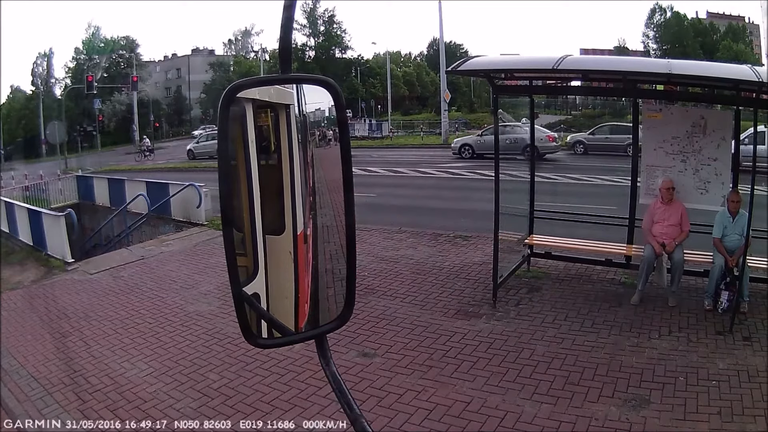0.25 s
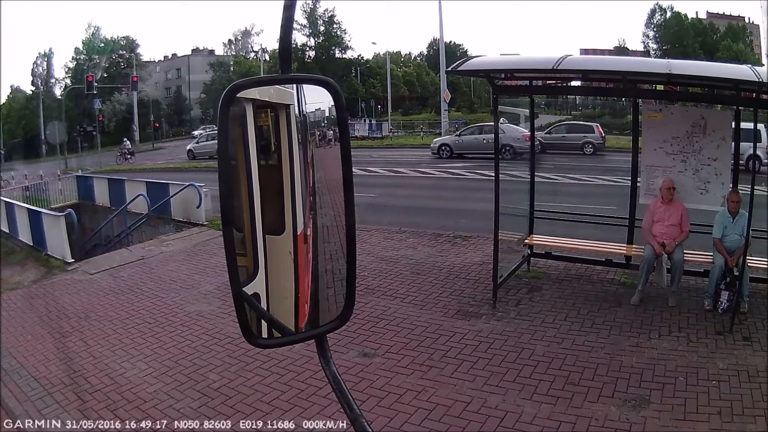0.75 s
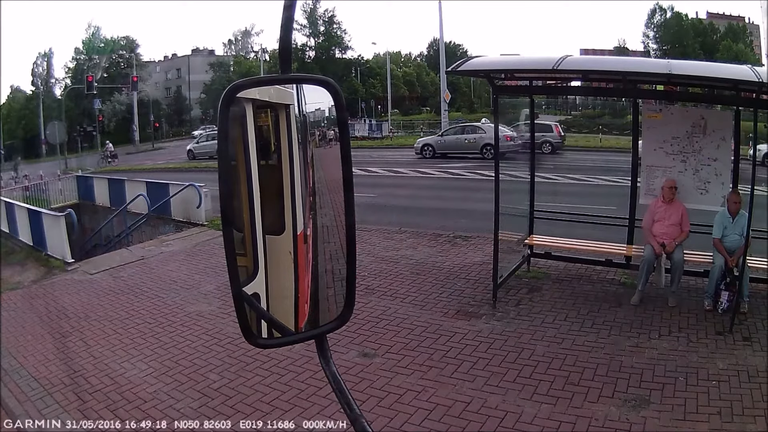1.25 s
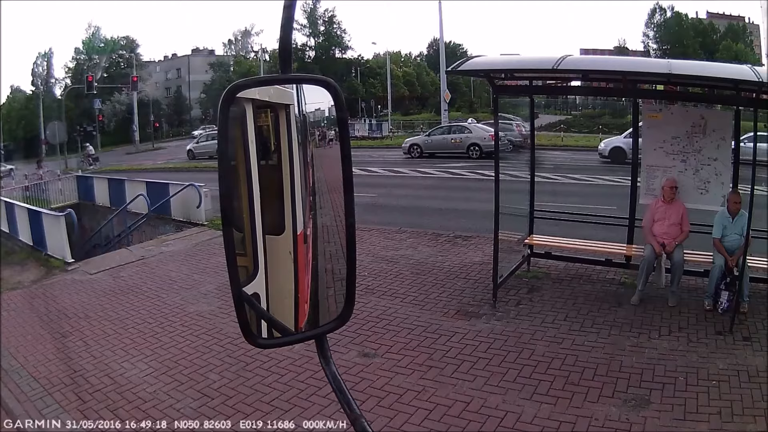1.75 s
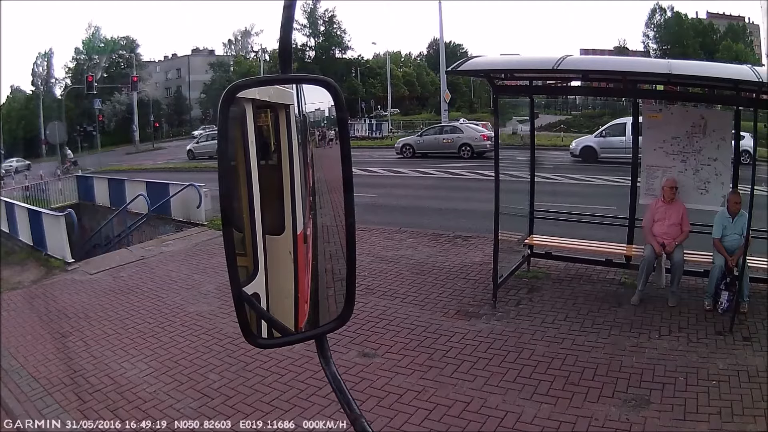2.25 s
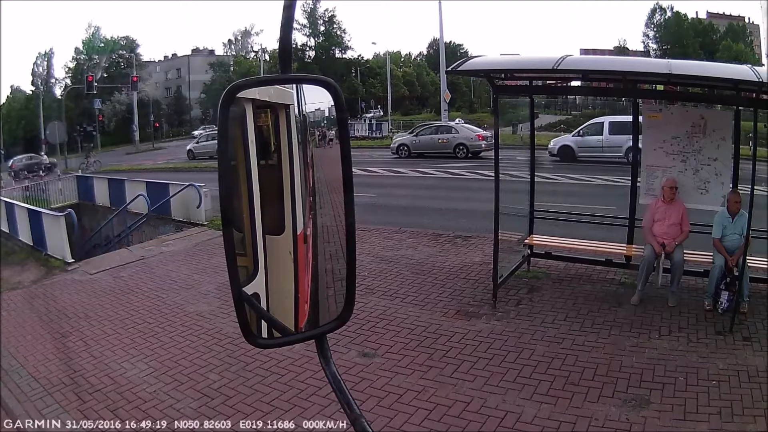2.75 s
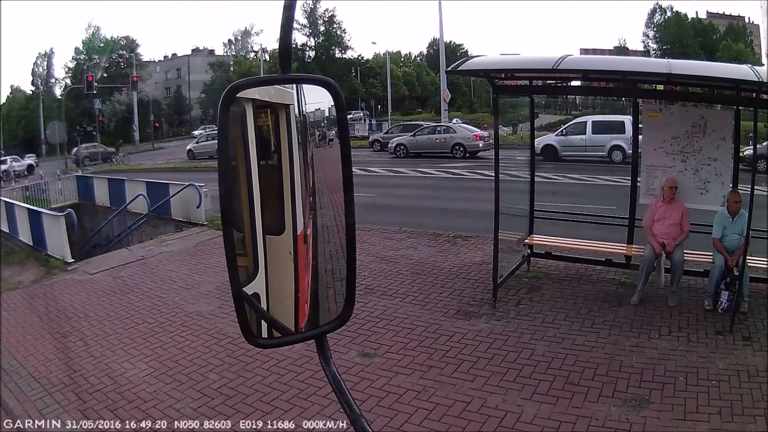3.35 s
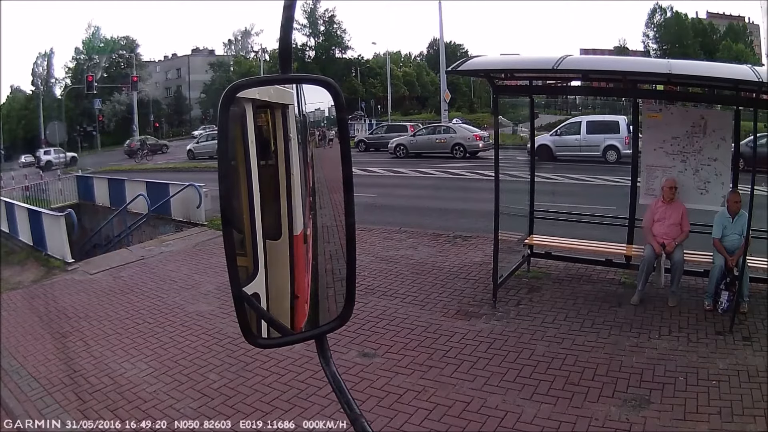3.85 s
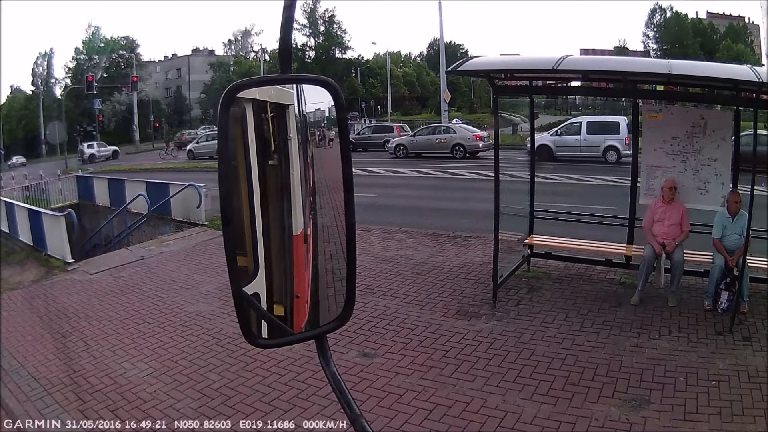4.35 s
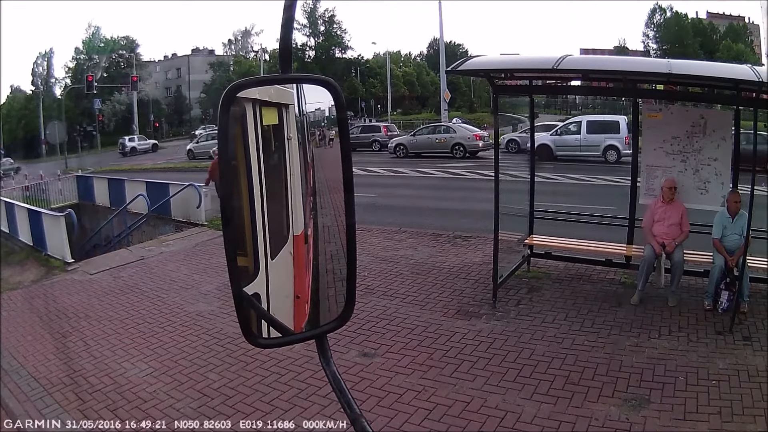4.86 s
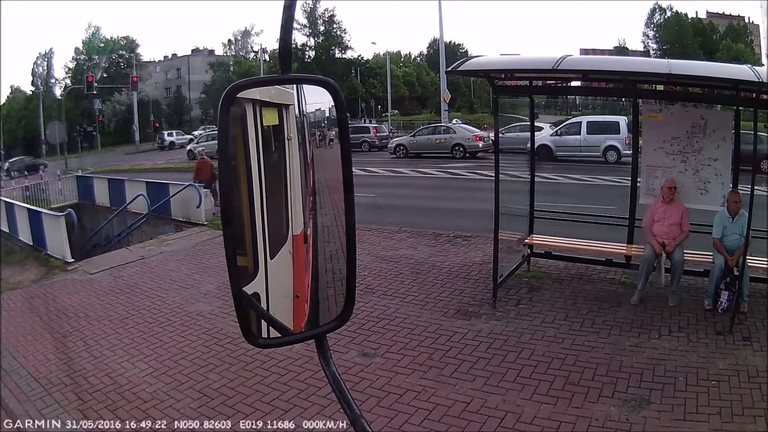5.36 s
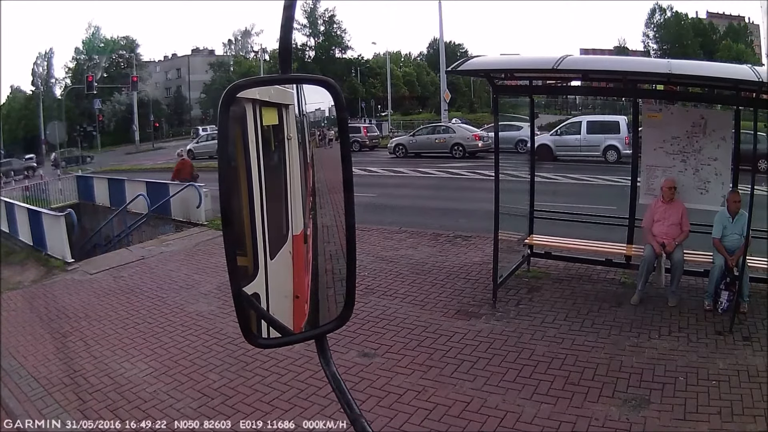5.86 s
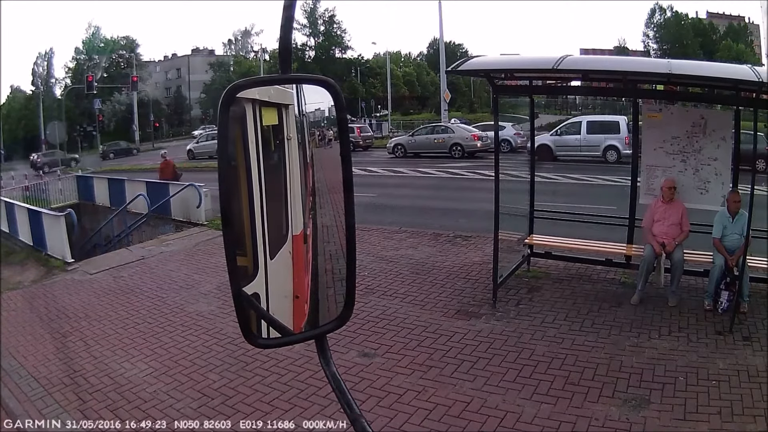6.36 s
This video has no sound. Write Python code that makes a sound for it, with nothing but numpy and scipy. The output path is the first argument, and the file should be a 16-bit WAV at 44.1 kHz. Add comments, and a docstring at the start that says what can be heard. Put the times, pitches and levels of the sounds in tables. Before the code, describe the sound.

A stationary tram hums faintly beside a road, with only a dull thud and tiny tick at first. Then its powered sliding door rolls noisily, whining upward, knocking and squeaking before a heavy, ringing slam. Low rocking booms linger while switchgear snaps crisply and running gear gives a soft final knock. The sound is heard from within the car, near the front, in one channel.

```python
"""Inside a tram at a stop: the car hums and rumbles while its sliding door rolls along, squeaks and slams shut.
The door is a gear whine, stick-slip squeaks and random rolling forces filtered by the resonances of its panels.
Knocks and clicks of door, switchgear and running gear are decaying noise bursts; struck parts add ringing modes.
Brief rough tones are narrow bands of noise; the body on its springs is low noise shaken by jolts.
Steady machine tones and a swelling wash lie beneath.
"""
import sys
import numpy as np
from scipy import signal
from scipy.fft import rfft, irfft
from scipy.io import wavfile
from scipy.ndimage import uniform_filter1d

SR = 44100
rng = np.random.default_rng(int(sys.argv[2]) if len(sys.argv) > 2 else 0)


def transcribe(u):
    """Save the signal u as a 16-bit wav file named by the first command-line argument.

    u: samples, shape (n,) or (channels, n), limited to [-1, 1]; the rate is SR.
    q: integer samples, one column per channel.
    """
    v = np.clip(np.atleast_2d(u).T, -1, 1)
    q = np.round(v * 32767).astype(np.int16)
    wavfile.write(sys.argv[1], SR, q)


N = 291456
TIME = np.arange(N) / SR
FREQS = np.fft.rfftfreq(N, 1 / SR)

# the door starts, rolls at an even effort and stops at the slam
DOOR_START_S, DOOR_ATTACK_S, DOOR_RELEASE_S, SLAM_S = 3.435, 0.031, 0.019, 4.84

# gear whine of the door drive, whose pitch follows the door's speed: start_s, pitch_hz, level_db
DRIVE = [(3.47, 200, -44), (3.53, 263.5, -38), (3.59, 400.7, -42), (3.68, 509.4, -41), (3.75, 584.3, -34.5),
         (3.83, 634.7, -39), (3.895, 614.4, -29.5), (3.96, 548, -37), (4.03, 583.7, -40), (4.08, 622, -40),
         (4.2, 695, -46), (4.32, 734, -46), (4.41, 790, -41.5), (4.53, 818.6, -37), (4.58, 765, -58),
         (4.67, 720, -44), (4.74, 640, -47), (4.8, 624, -34.5)]
# resonances of the door's panels: pitch_hz, width_hz, lift_db
PANELS = [(121.4, 34, 6.5), (257, 22, 3.5), (378, 9.7, 7), (456, 10, 4), (542, 13, 2.5), (737, 5, 7.5),
          (1022, 49, 4), (1287, 15, 5), (2268, 41, 6), (2758, 12, 8.5), (3516, 33, 7.5), (3690, 50, 6)]
# resonances of the door's hanger: pitch_hz, width_hz, lift_db
HANGER = [(485, 33, 7.5), (735, 27, 2.6), (843, 39, 3.1), (900, 30, 3.2), (1248, 41, 10), (2160, 33, 7.3),
          (2330, 63, 9), (3150, 62, 4.4)]
# resonances of the door's runner: pitch_hz, width_hz, lift_db
RUNNER = [(250, 31, 3.4), (472, 42, 7.5), (716, 21, 8.5), (1200, 98, 7.2), (1490, 96, 8.5),
          (1793, 17, 15.8), (2130, 20, 13.4), (3520, 18, 14)]
# resonances of the switchgear: pitch_hz, width_hz, lift_db
SWITCH = [(730, 50, 3.8), (930, 80, 4.2), (1060, 90, 2.2), (1503, 66, 4.9), (3490, 110, 4.5)]
# resonances of the running gear: pitch_hz, width_hz, lift_db
GEAR = [(215, 25, 5.7), (286, 18, 7), (531, 25, 9.2), (1490, 28, 4.9), (1890, 89, 4.5), (3230, 130, 14),
        (3880, 94, 5), (5300, 160, 8.7), (5950, 87, 12)]
# spectrum of small bright contacts, before tilt: pitch_hz, relative_db
CLICK_COLOUR = [(300, 5.5), (900, 11), (2000, 3), (3500, 0.5), (5000, -4.5), (7500, -10.5), (11000, -11),
                (13000, -17), (16000, -28)]


def drive(coast_db=-33, coast_hz=484, sag_hz_per_s=980, coast_s=0.26):
    """Gear meshing: the whine's pitch follows the door's speed, then swells and sinks once the slam frees it."""
    hz, db = follow(DRIVE)
    effort, _ = travel()
    t = np.clip(TIME - SLAM_S, 0, coast_s)
    swell = np.sin(np.pi * t / coast_s)
    coasting = amp(coast_db) * swell * gears(coast_hz - sag_hz_per_s * t)
    return amp(db) * effort * gears(hz) + coasting


def travel():
    """Kinematics of the door: its effort, 0-1, and its speed, taken from the whine as a share of the fastest."""
    attack = np.clip((TIME - DOOR_START_S) / DOOR_ATTACK_S, 0, 1)
    release = np.clip((SLAM_S - TIME) / DOOR_RELEASE_S, 0, 1)
    hz = follow(DRIVE)[0]
    return attack * release, hz / hz.max()


def gears(hz, octave_db=-16, wobble=0.01194, wobble_hz=32, catch_db=2.5, catch_hz=24,
          grind_db=-8.5, grind_width_hz=70):
    """Random modulation: a gear tone and its octave waver in pitch and level inside a band of grinding."""
    turn = 2 * np.pi * np.cumsum(hz * (1 + wobble * drift(wobble_hz))) / SR
    harmonics = np.sin(turn) + amp(octave_db) * np.sin(2 * turn)
    catching = amp(catch_db * drift(catch_hz))  # the gears catch and let go unevenly
    return unit(unit(harmonics * catching) + amp(grind_db) * fuzzy(hz, grind_width_hz))


def squeak(width_hz=230, reach_hz=600, ring_width_hz=70, ring_s=0.028):
    """Stick-slip of a dry roller: a rough, mostly climbing tone wakes each ring it nears, and the ring lingers."""
    # the squeak itself: start_s, pitch_hz, level_db
    slip = [(4.05, 5940, -51), (4.078, 5850, -39.5), (4.095, 6750, -41.5), (4.125, 6800, -42),
            (4.15, 7040, -40), (4.175, 7050, -61), (4.23, 7050, -70)]
    # fixed rings of the roller: pitch_hz, level_db
    roller_ring = [(5850, -9), (7900, -3)]
    hz, db = follow(slip)
    force = during(slip) * amp(db)
    keep = np.exp(-1 / (ring_s * SR))
    out = force * fuzzy(hz, width_hz)
    for mode_hz, mode_db in roller_ring:
        nearness = 1 / (1 + ((hz - mode_hz) / reach_hz) ** 2)
        woken = signal.lfilter([1 - keep], [1, -keep], force * nearness + 1e-12)
        out += amp(mode_db) * woken * fuzzy(mode_hz, ring_width_hz)
    return out


def rollers(rattle, bumps_per_s=150, bump_decay_s=0.017, smooth=0.75, drum_db=-36, roll_db=-33.0,
            speed_power=0.79, ease_db_per_s=4.0, rattle_roll_db=-6):
    """Forced vibration: bumps and a smooth rub drive the panels, by the door's motion and by the jolts' rattle."""
    # low drumming of the panels: pitch_hz, relative_db
    drum_colour = [(45, -31), (70, -6), (115, -6), (170, -6), (215, -14.5), (400, -21.5), (800, -90)]
    # rolling of the door: pitch_hz, relative_db
    roll_colour = [(130, -23), (205, -5), (265, 1), (400, 0), (650, -2.5), (900, -9.5), (1300, -15.5),
                   (2200, -23), (3500, -32.5), (5000, -42), (10500, -60), (13000, -49), (16000, -72)]
    effort, speed = travel()
    bumps = (rng.random(N) < bumps_per_s / SR) * rng.choice([-1, 1], N)
    t = TIME[:SR // 10]
    spread = rng.standard_normal(len(t)) * np.exp(-t / bump_decay_s)
    bumps = signal.oaconvolve(bumps, spread)[:N]  # each spreads through the frame
    force = ringing(unit(bumps) + smooth * rng.standard_normal(N), PANELS)
    drumming = np.hypot(amp(drum_db) * effort, rattle)
    easing = amp(roll_db - ease_db_per_s * (TIME - DOOR_START_S))  # as the door settles in
    rolling = np.hypot(easing * effort * speed ** speed_power, amp(rattle_roll_db) * rattle)
    drummed = drumming * coloured(force, read(drum_colour, FREQS))
    return drummed + rolling * coloured(force, read(roll_colour, FREQS))


def grit(level_db=-59.5, flicker_db=6.0, flicker_hz=25, tilt_db=4):
    """Friction noise: a fine, flickering scrape of the door along its guide, louder with speed."""
    effort, speed = travel()
    tilt = tilt_db * np.log2(np.maximum(FREQS, 2000) / 4000)  # dB per octave above 2 kHz
    scrape = coloured(rng.standard_normal(N), read(CLICK_COLOUR, FREQS) + tilt)
    return amp(level_db + flicker_db * drift(flicker_hz)) * effort * speed * scrape


def knocks(level_db=20, tilt_db=-2, pivot_hz=550, softening_order=2.35, bass_share=0.22, note_share=0.15,
           note_db=6, rise_s=0.0044, usual_t60_s=0.21, looseness=1.07):
    """Impact: harder contact reaches higher, a high note has less bass, a longer ring also builds up slowly."""
    # blows: start_s, level_db (relative), upper corner_hz (hardness), t60_s (at 2 kHz),
    # contact's own note_hz, part struck
    blows = [(0.941, -32, 213, 0.13, 164, PANELS), (1.927, -50, 3000, 0.15, 1700, PANELS),
             (3.658, -32, 3050, 0.19, 320, HANGER), (3.669, -27, 2600, 0.21, 860, HANGER),
             (3.722, -36.5, 3500, 0.14, 1100, HANGER), (3.978, -32, 7200, 0.25, 2940, PANELS),
             (4.226, -24.5, 2004, 0.15, 1400, RUNNER), (4.239, -25, 2000, 0.2, 1090, RUNNER),
             (4.662, -35.5, 5860, 0.27, 1280, PANELS), (4.812, -25, 5020, 0.19, 730, PANELS),
             (4.822, -20.5, 5020, 0.39, 1080, PANELS), (4.836, -17.5, 13000, 0.24, 100, PANELS),
             (5.142, -38, 7200, 0.67, 3230, PANELS), (5.164, -32.5, 600, 0.4, 365, PANELS),
             (5.232, -39, 5360, 0.42, 1030, PANELS), (5.479, -38.5, 3500, 0.36, 1190, PANELS),
             (5.672, -28, 13000, 0.1, 570, SWITCH), (5.679, -23, 3000, 0.12, 860, SWITCH),
             (5.743, -35.5, 6000, 0.16, 650, SWITCH), (5.85, -36.5, 4200, 0.21, 1790, SWITCH),
             (6.108, -42.5, 3960, 0.11, 1140, PANELS), (6.124, -41.5, 4500, 0.16, 1190, PANELS),
             (6.422, -36, 2000, 0.2, 1970, GEAR), (6.438, -30, 1900, 0.11, 263, GEAR),
             (6.448, -25.5, 2000, 0.1, 208, GEAR), (6.459, -39, 1500, 0.2, 358, GEAR),
             (6.492, -45, 1400, 0.18, 650, GEAR), (6.549, -43, 2820, 0.18, 784, GEAR)]
    # spectrum common to all blows, before tilt: pitch_hz, relative_db
    blow_colour = [(30, 3), (60, 6), (110, -5), (200, -8), (400, -6), (750, -4), (1100, -13), (1600, -13.5),
                   (2400, -15.5), (3800, -16.5), (5000, -17.5), (8000, -16), (11200, -11.5), (12500, -25.5),
                   (16000, -29)]
    out, hz = np.zeros(N), np.fft.rfftfreq(SR, 1 / SR) + 1
    colour_db = level_db + read(blow_colour, hz) + tilt_db * np.log2(np.maximum(hz, 100) / pivot_hz)
    for s, db, corner_hz, t60, note_hz, part in blows:
        treble_loss = np.hypot(1, (hz / corner_hz) ** softening_order)
        bass_loss = np.hypot(1, bass_share * note_hz / hz)
        blow_db = db + colour_db - 20 * np.log10(treble_loss * bass_loss)
        blow = burst(blow_db, rise_s * (t60 / usual_t60_s) ** looseness, t60)
        note = lift(blow, note_hz, note_share * note_hz, note_db)
        add(out, s, ringing(blow + note, part) + struck(part, blow_db))
    return out


def burst(colour_db, rise, t60, bass_stretch=0.14, grain_db=3.0, ripple_db=2.0, chatter_db=0.52,
          contact=0.39, contact_s=0.00075):
    """Scattering: a first contact and a quick rise lead to an uneven, chattering decay, slower in the bass."""
    t = TIME[:SR]
    hz, at, z = signal.stft(rng.standard_normal(SR), SR, nperseg=256)
    band_t60 = t60 * (1 + bass_stretch * np.log2(2000 / np.clip(hz, 250, 12000)))
    z *= 10 ** (-3 * at / band_t60[:, None])
    grain = uniform_filter1d(rng.standard_normal(z.shape), size=4, axis=0)
    z *= amp(grain_db * unit(uniform_filter1d(grain, size=8, axis=1)))
    tail = signal.istft(z, SR, nperseg=256)[1][:SR]
    # the many small modes of the part
    ripple = ripple_db * unit(uniform_filter1d(rng.standard_normal(len(colour_db)), size=130))
    chatter = amp(chatter_db * unit(uniform_filter1d(rng.standard_normal(SR), size=90)))
    first_contact = contact * t / contact_s * np.exp(1 - t / contact_s)
    attack = 1 - np.exp(-t / max(rise, 1e-4)) + first_contact
    fade = np.cos(np.pi * t / 2) ** 2  # reaches silence after 1 s
    return irfft(rfft(tail * chatter) * amp(colour_db + ripple), SR) * attack * fade


def struck(part, colour_db, ring_db=24, rise_s=0.0011):
    """Free vibration: the contact sets off a part's modes at once, and each wider mode dies sooner."""
    t, freqs = TIME[:SR], np.fft.rfftfreq(SR, 1 / SR)
    ring = np.zeros(SR)
    for hz, width, lift_db in part:
        strength = amp(np.interp(hz, freqs, colour_db)) * (amp(lift_db) - 1) * 2 * np.pi * width / SR
        decay = np.exp(-np.pi * width * t)
        ring += strength * decay * np.sin(2 * np.pi * (hz * t + rng.random()))
    return amp(ring_db) * ring * (1 - np.exp(-t / rise_s))


def leaf(rise_s=0.0049, stiffening=0.059, settle_s=0.071, bending_below_hz=500):
    """Modal decay: the slammed leaf's modes start sharp, chiefly the low ones, and sink as it relaxes."""
    # modes of the door leaf: pitch_hz (once settled), level_db, t60_s
    modes = [(105, -11.5, 0.34), (171, -24, 0.56), (254.5, -31, 0.76), (379, -22, 0.85), (472, -24, 0.45),
             (533, -26, 0.33), (657, -23, 0.38), (736, -30, 0.42), (817, -35, 0.9), (890, -33, 0.36),
             (1050, -44, 0.38), (2480, -28, 0.17), (3750, -22.5, 0.11)]
    t = np.maximum(TIME - SLAM_S, 0)
    lead_s = stiffening * settle_s * (1 - np.exp(-t / settle_s))
    ring = np.zeros(N)
    for hz, db, t60 in modes:
        cycles = hz * t + min(hz, bending_below_hz) * lead_s
        ring += amp(db - 60 * t / t60) * np.sin(2 * np.pi * (cycles + rng.random()))
    return ring * (1 - np.exp(-t / rise_s))


def shoves():
    """Damped oscillation: each heavy blow shoves the wall, which swings back and dies away."""
    # shoves of the wall: start_s, level_db, pitch_hz, t60_s
    swings = [(4.226, -12, 36, 0.19), (4.836, -5, 28.2, 0.2), (5.235, -20.5, 134.7, 0.25),
              (5.669, -9, 39, 0.23), (6.447, -16, 107, 0.07)]
    out, t = np.zeros(N), TIME[:SR]
    for s, db, hz, t60 in swings:
        add(out, s, amp(db - 60 * t / t60) * np.sin(2 * np.pi * hz * t))
    return out


def clicks(level_db=4.0, rise_s=0.0023, t60_s=0.27, tilt_db=6.0, softening_order=3.4):
    """Brief impact of metal on metal: the harder the contact, the higher its spectrum reaches."""
    # relays, latches and rollers: start_s, level_db (relative), upper corner_hz
    contacts = [(3.388, -49, 14000), (3.405, -36.5, 12900), (3.456, -44.5, 12000), (3.719, -35, 10100),
                (4.07, -41, 12000), (4.261, -45.5, 11000), (4.474, -53, 8980), (4.838, -27.5, 12960),
                (5.414, -53.5, 14000), (5.589, -48, 14000), (5.643, -44, 14000), (5.672, -25.5, 18000),
                (5.696, -37, 14000), (5.739, -35, 15000), (5.75, -39, 15000), (5.851, -51, 12000),
                (6.121, -63, 12000), (6.447, -46, 11000), (6.565, -48.5, 12000)]
    out, hz = np.zeros(N), np.fft.rfftfreq(SR, 1 / SR)
    tilt = tilt_db * np.log2(np.maximum(hz, 2000) / 4000)  # dB per octave above 2 kHz
    colour_db = level_db + read(CLICK_COLOUR, hz) + tilt
    for s, db, corner_hz in contacts:
        loss = np.hypot(1, (hz / corner_hz) ** softening_order)
        add(out, s, burst(db + colour_db - 20 * np.log10(loss), rise_s, t60_s))
    return out


def rough_tones(rise_s=0.0088, t60_s=0.2, width_hz=230):
    """Narrow-band noise: brief rough tones that swell and die."""
    # brief rough tones: start_s, pitch_hz, level_db
    tones = [(1.923, 2500, -56), (3.968, 3060, -42), (4.062, 2110, -42.5), (4.088, 2130, -42),
             (4.307, 4200, -53.5), (4.737, 2500, -45), (6.098, 3530, -53), (6.422, 2820, -48),
             (6.43, 3300, -44), (6.436, 1920, -39), (6.44, 5950, -53)]
    out, t = np.zeros(N), TIME[:SR // 3]
    freqs = np.fft.rfftfreq(len(t), 1 / SR)
    shape = np.minimum(t / rise_s, 1) * amp(-60 * np.maximum(t - rise_s, 0) / t60_s)
    for s, hz, db in tones:
        band = np.exp(-((freqs - hz) / width_hz) ** 2)
        tone = unit(irfft(rfft(rng.standard_normal(len(t))) * band, len(t)))
        add(out, s, amp(db) * shape * tone)
    return out


def jolts():
    """Incoherent addition: the jolts' rocking of the body and rattling of the panels add up in power."""
    # jolts, before the sway is added: start_s, rocking_db, rattle_db
    shocks = [(3.701, -22, -36), (3.87, -26, -30), (4.049, -41.5, -32.5), (4.22, -39, -28.5),
              (4.409, -46, -29.5), (4.814, -15, -19), (5.019, -14, -34.5), (5.127, -7.5, -27.5),
              (5.219, -21, -25.5), (5.29, -9.5, -50), (5.446, -11.5, -29), (5.539, -14.5, -35),
              (5.66, -22, -43), (5.81, -23, -39.5), (6.038, -42, -38.5), (6.118, -29, -45),
              (6.36, -28, -41.5), (6.439, -29, -30)]
    rocking, rattle = np.zeros(N), np.zeros(N)
    for s, rocking_db, rattle_db in shocks:
        rocking += (amp(rocking_db) * dying(s, 0.56, sway_db=-15, sway_t60=3.3)) ** 2
        rattle += (amp(rattle_db) * dying(s, 0.75, sway_db=-23.5, sway_t60=7)) ** 2
    return np.sqrt(rocking), np.sqrt(rattle)


def dying(s, t60, sway_db, sway_t60, rise_s=0.019):
    """Double decay: a jolt swells, dies quickly and leaves a slow sway; both t60 values in seconds."""
    t = np.maximum(TIME - s, 0)
    after = np.maximum(t - rise_s, 0)
    return np.minimum(t / rise_s, 1) * (amp(-60 * after / t60) + amp(sway_db - 60 * after / sway_t60))


def body(rocking, door_db=-23, steadiness=0.29, boom_hz=48, boom_width_hz=11, boom_db=-10, boom_growth=0.22):
    """Mass on springs: noise throbs at the body's low resonance, and a higher floor boom grows with hard jolts."""
    # spectrum of the body on its springs: pitch_hz, relative_db
    springs = [(12, -12.5), (21, -3.5), (28, 2.5), (35, 3), (46, -1), (62, -12), (90, -25.5), (160, -76.5)]
    # steady part of the shaking: start_s, level_db
    steady = [(0, -35.5), (1, -30), (2.2, -29.5), (3.3, -31), (6.6, -27.5)]
    effort, speed = travel()
    door_shake = amp(door_db) * effort * speed
    shake = np.sqrt(amp(follow(steady)[0]) ** 2 + door_shake ** 2 + rocking ** 2)
    throb = coloured(rng.standard_normal(N), read(springs, FREQS))
    strength = np.sqrt(uniform_filter1d(throb ** 2, size=5000) + 1e-9)
    boom = amp(boom_db) * (shake / shake.max()) ** boom_growth * fuzzy(boom_hz, boom_width_hz)
    return shake * (unit(throb / strength ** steadiness) + boom)  # the throb's own swells partly evened out


def idle(wander=0.00407, wander_hz=8.5, hum_db=-2.0, whistle_above_hz=800):
    """Tonal machine noise: the auxiliary machines' lines waver in pitch over the wash."""
    # machine hum, before hum_db and the whistle curve: pitch_hz, level_db
    hum = [(258.4, -56), (360.7, -58.5), (629.8, -63.5), (904.4, -73), (1157, -71), (2245, -79.5)]
    # the thin upper whistles come and go: start_s, lift_db
    whistle = [(0, 1), (1.8, -2), (2.1, 9), (2.9, 7), (3.3, 5), (6.6, -15)]
    out = wash()
    whistle_db = follow(whistle)[0]
    for hz, db in hum:
        level_db = db + hum_db + (hz > whistle_above_hz) * whistle_db
        turn = 2 * np.pi * hz * np.cumsum(1 + wander * drift(wander_hz)) / SR
        out += amp(level_db) * np.sqrt(2) * np.sin(turn)
    return out


def wash(level_db=-45, swell_db=1.47, swell_hz=5):
    """Broadband noise of fans and street: each low and middle band swells and sinks on its own."""
    # spectrum of the waiting car: pitch_hz, relative_db
    colour = [(41, -42), (70, -3), (118, 1.5), (185, -7.5), (254, -7), (291, -11.5), (356, -5), (390, -12),
              (641, -15.5), (822, -18), (1130, -22.5), (1230, -24.5), (3330, -35), (15500, -38)]
    edges = [0, 180, 400, 750, 1400]  # Hz; steady above the last
    z = rfft(coloured(rng.standard_normal(N), read(colour, FREQS)))
    out = irfft(z * (FREQS >= edges[-1]), N)
    for lo, hi in zip(edges, edges[1:]):
        band = irfft(z * (FREQS >= lo) * (FREQS < hi), N)
        out += band * unit(amp(swell_db * drift(swell_hz)))
    return amp(level_db) * out


def cabin(x):
    """Reverberation: the hard-walled car adds a diffuse tail whose decay time depends on frequency."""
    # decay of the car: pitch_hz, t60_s
    decay = [(100, 1), (500, 0.44), (2000, 0.31), (8000, 0.14), (16000, 0.16)]
    hz, t, z = signal.stft(rng.standard_normal(SR), SR, nperseg=256)
    tail = signal.istft(z * 10 ** (-3 * t / read(decay, hz)[:, None]), SR, nperseg=256)[1]
    return signal.fftconvolve(x, tail / np.linalg.norm(tail))[:N]


def ringing(x, part):
    """Superposition: a force passes through the parallel resonances of one part."""
    return x + sum(lift(x, *mode) for mode in part)


def lift(x, hz, width, lift_db):
    """Resonance: the ring that, added to the direct sound, raises it by lift_db at hz."""
    return (amp(lift_db) - 1) * signal.lfilter(*signal.iirpeak(hz, hz / width, fs=SR), x)


def fuzzy(hz, width_hz):
    """Narrow-band noise: slow chance in quadrature carried along a pitch curve gives a rough tone."""
    turn = 2 * np.pi * np.cumsum(hz * np.ones(N)) / SR
    return unit(drift(width_hz) * np.cos(turn) + drift(width_hz) * np.sin(turn))


def drift(rate_hz):
    """Low-pass noise: smooth chance, cut gradually around a rate, at an rms of 1."""
    return unit(irfft(rfft(rng.standard_normal(N)) * np.exp(-(FREQS / rate_hz) ** 2), N))


def coloured(x, db):
    """Spectral shaping: filters x by a gain in dB, then sets an rms of 1."""
    return unit(irfft(rfft(x) * amp(db), N))


def amp(db):
    """Level to amplitude: decibels become gain."""
    return 10 ** (np.asarray(db) / 20)


def unit(x):
    """Normalisation: scales to an rms of 1."""
    return x / np.sqrt(np.mean(x ** 2) + 1e-20)


def read(points, hz):
    """Logarithmic pitch: reads a spectrum on a log-frequency axis."""
    f, value = np.transpose(points)
    return np.interp(np.log(hz + 1), np.log(f + 1), value)


def follow(rows):
    """Linear interpolation: each column of a timed curve, sample by sample."""
    s, *columns = np.transpose(rows)
    return [np.interp(TIME, s, c) for c in columns]


def during(rows):
    """Gating: one while a curve lasts, zero outside it."""
    return (TIME > rows[0][0]) & (TIME < rows[-1][0])


def add(mix, s, sound):
    """Superposition: lays a sound into the mix at s seconds."""
    part = mix[round(s * SR):][:len(sound)]
    part += sound[:len(part)]


def scene():
    """Sum of pressures: door, knocks and waiting car in one channel; whine and squeak also reverberate."""
    rocking, rattle = jolts()
    whine, squeal = drive(), squeak()
    direct = amp(-1.3) * whine + amp(-2.0) * squeal
    door = direct + cabin(amp(-10.5) * whine + amp(-5.5) * squeal)
    door += rollers(rattle) + grit()
    blows = knocks() + leaf() + shoves() + clicks()
    return (door + blows + rough_tones() + body(rocking) + idle())[None]


def record(dry, knee=0.75, headroom=0.2, edge_hz=15800):
    """Saturation and band limiting: peaks above the knee are rounded off, then a low-pass cuts the top."""
    held = np.clip(dry, -knee, knee)
    rounded = held + headroom * np.tanh((dry - held) / headroom)
    lowpass = signal.firwin(1023, edge_hz, window=("kaiser", 9), fs=SR)
    return signal.oaconvolve(rounded, lowpass[None], "same")


dry = scene()
out = record(dry)
transcribe(out)
```